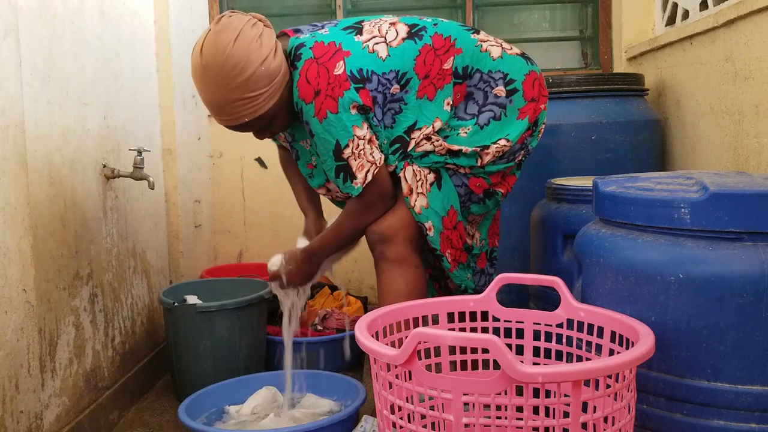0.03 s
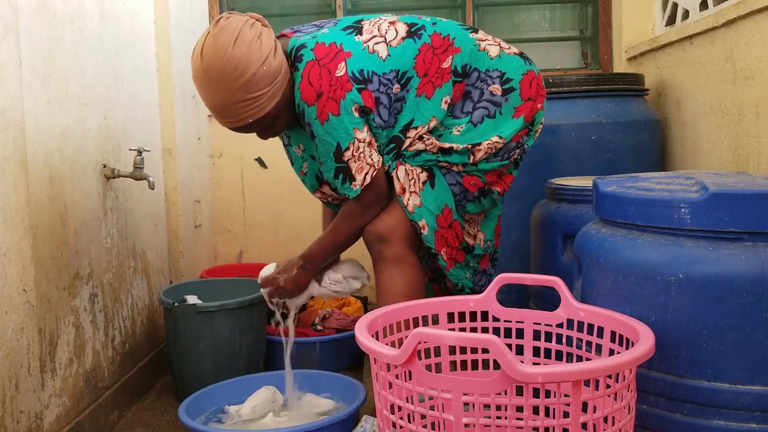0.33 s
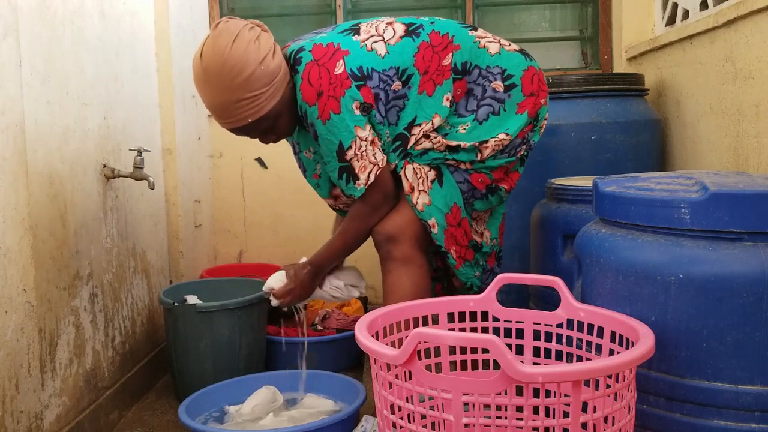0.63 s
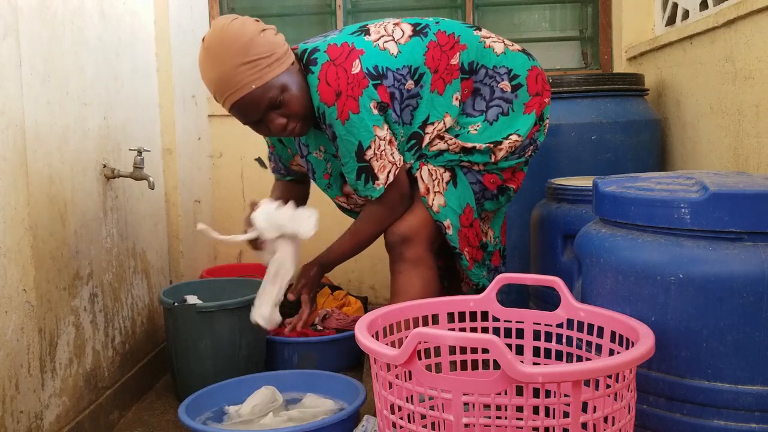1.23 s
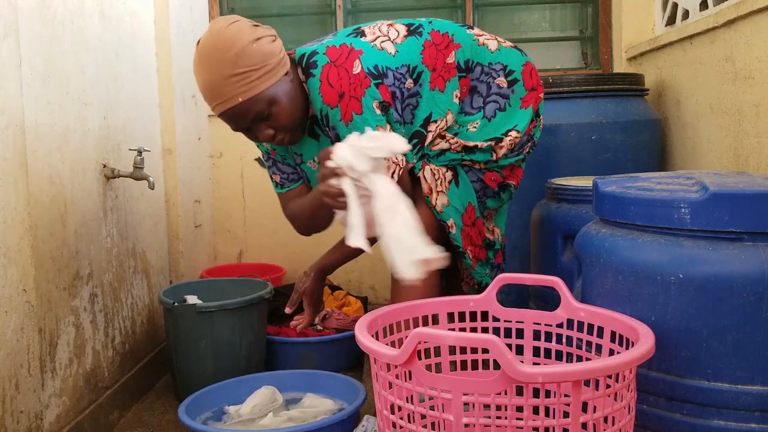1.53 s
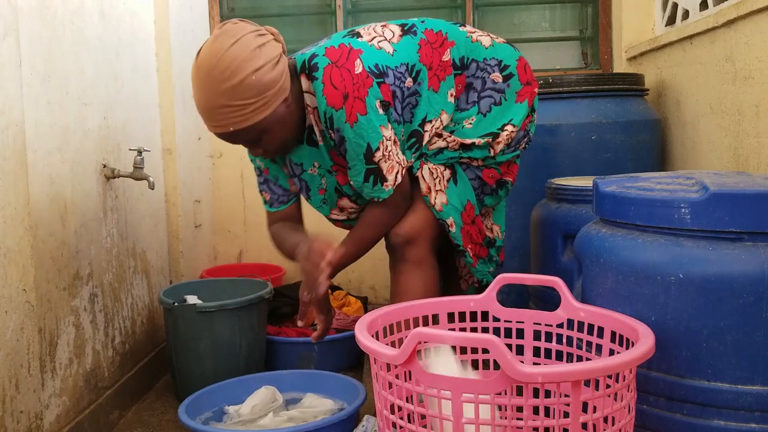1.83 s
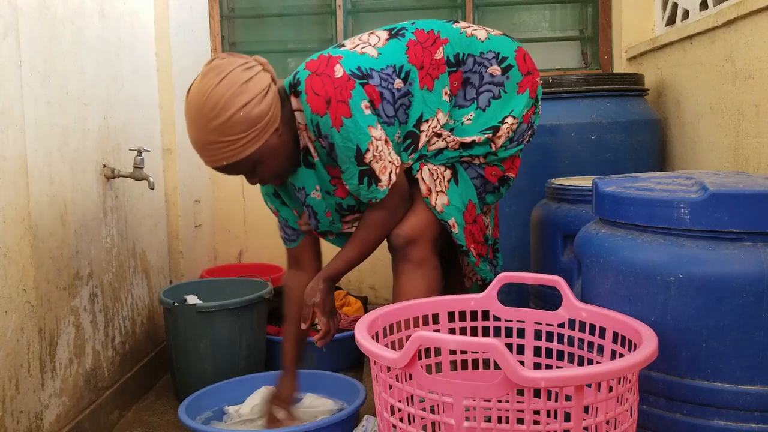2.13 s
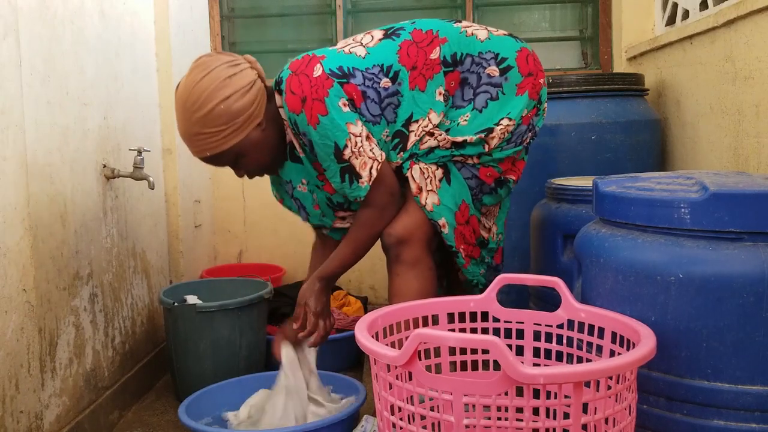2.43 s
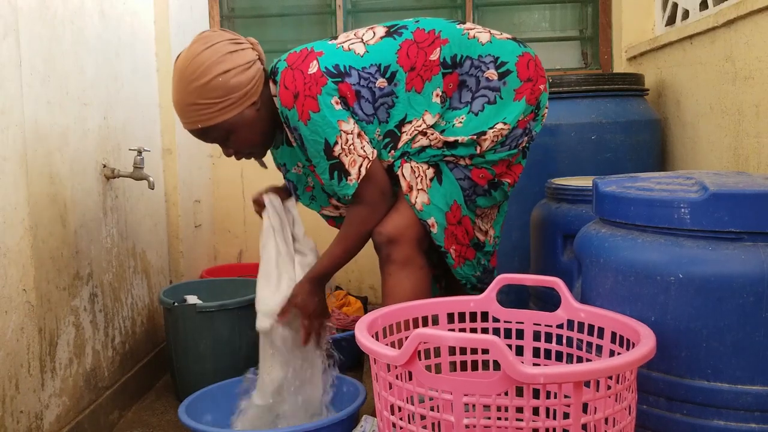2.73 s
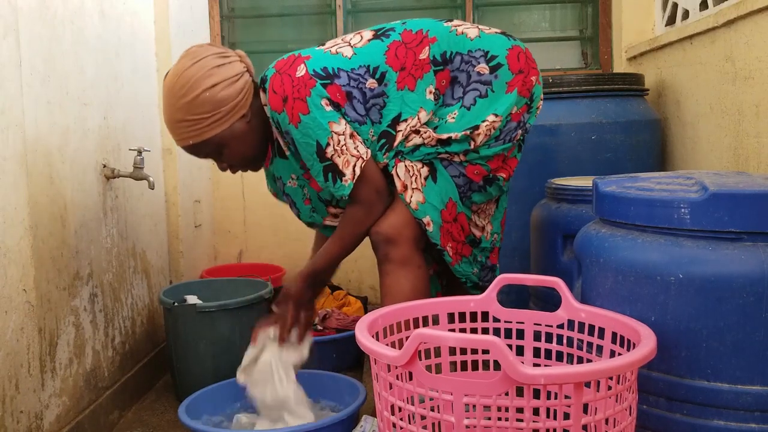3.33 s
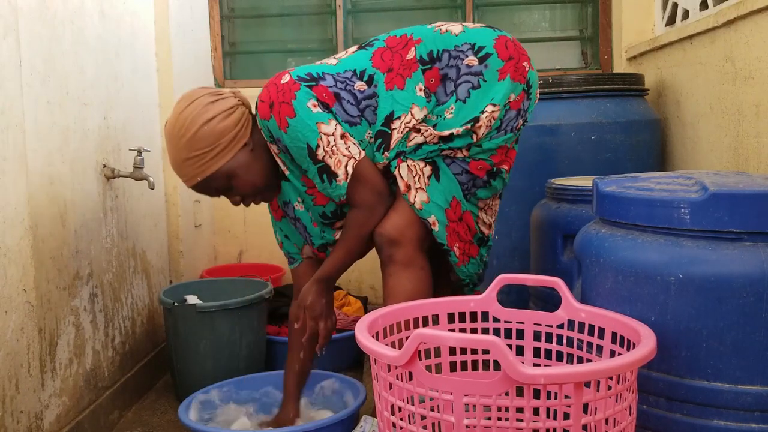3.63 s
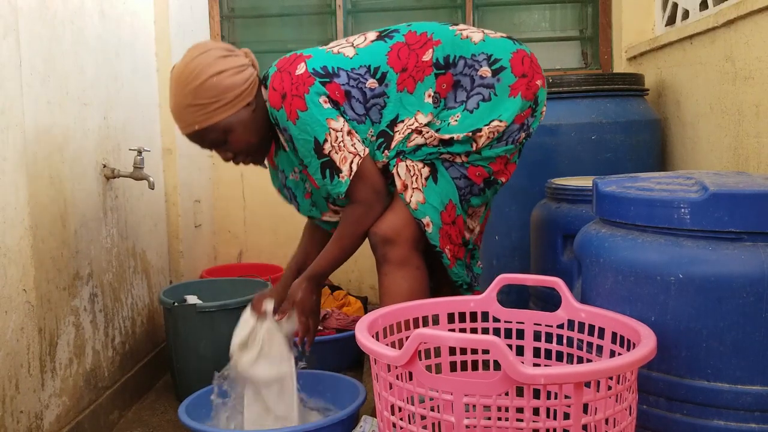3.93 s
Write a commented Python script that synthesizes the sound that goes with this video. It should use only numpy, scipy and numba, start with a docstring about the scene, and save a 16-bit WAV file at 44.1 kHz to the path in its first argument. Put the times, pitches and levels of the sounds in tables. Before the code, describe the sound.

Water patters into a plastic basin as cloth is wrung, thinning to a dribble. The wet cloth slaps into a plastic basket, then another piece is dunked with sloshing and gulps. A bird chirps twice in the small yard.

```python
"""Water wrung from a cloth patters into a plastic basin and thins to a dribble in a small walled yard.
The cloth slaps into a plastic basket, which rings; the next piece is lifted streaming and dunked again.
The water sounds through trapped air: each bubble is a damped oscillator, and thousands merge into patter
and slosh. A bird chirps twice, and a distant low rumble goes on throughout."""
import sys
import numpy as np
from scipy import signal
from scipy.fft import rfft, irfft
from scipy.io import wavfile
from scipy.ndimage import map_coordinates
from numba import njit

SR = 44100
rng = np.random.default_rng(int(sys.argv[2]) if len(sys.argv) > 2 else 0)


def inscribe(sig):
    """Save sig as 16-bit PCM at rate SR to the path in sys.argv[1].

    A 1-D sig is mono; a 2-D sig holds one channel per row.
    Samples are clipped to [-1, 1] before scaling.
    """
    pcm = np.round(np.clip(np.atleast_2d(sig).T, -1, 1) * 32767)
    wavfile.write(sys.argv[1], SR, pcm.astype(np.int16))


N = 176400
T = np.arange(N) / SR


# Twists of the cloth. Each row: peak time, rise and fall in seconds, relative patter and mist in dB.
TWISTS = [(.07, 0.93, 0.18, -29.5, -40), (.335, 0.082, 0.04, -35, -50), (.72, 1, 0.3, -51.5, -58)]
# Spectra of the stream, mist, basin and suds. Each row: frequency in Hz, relative level in dB.
STREAM_SPECTRUM = [(300, -6), (650, -14.5), (1100, -4.5), (2700, 2), (3700, -4.5), (5200, -4), (7500, -9.5)]
MIST_SPECTRUM = [(4500, 4), (7000, -4.5), (9000, -2), (12000, 1.5), (15500, -13)]
BASIN_SPECTRUM = [(600, -13), (670, -13), (800, -12), (1020, -9), (1130, 5), (1260, -11), (2000, -6)]
SUDS_SPECTRUM = [(7300, -21), (8000, 14), (9600, 11), (10200, -35)]

def wringing():
    """Drop impact: each twist sheds a stream that patters, throws mist, rings the basin and stirs suds."""
    patter = shaped(swarm(449, 7940, per_s=4000, cycles=9.9, spread_db=3.5), STREAM_SPECTRUM)
    mist = shaped(swarm(4500, 16000, per_s=9900, cycles=5, spread_db=-1), MIST_SPECTRUM)
    basin = shaped(swarm(575, 2020, per_s=1200, cycles=12, spread_db=3.5), BASIN_SPECTRUM)
    flow, mist_gain = surge_envelopes(TWISTS)
    hum_db, fade_db_per_s, end_s = -40, 13.5, 1.178
    hum_gain = undb(hum_db - fade_db_per_s * T) * np.clip((end_s - T) * 10, 0, 1)
    fizz = undb(-6) * shaped(mist, SUDS_SPECTRUM) * np.sqrt(mist_gain * hum_gain)
    return undb(4) * patter * flow + undb(6.5) * mist * mist_gain + basin * hum_gain + fizz


# Surges as the cloth is lifted and dunked. Each row: peak time, rise and fall in seconds,
# then relative levels of churn, slosh, patter and spray in dB.
SURGES = [(2.31, 0.059, 0.084, -50, -53, -45, -58), (2.42, 0.037, 0.24, -50.5, -36, -43, -50.5),
          (2.568, 0.066, 0.1, -36, -26.5, -28.5, -40), (2.83, 0.13, 0.19, -55, -27.5, -28, -33),
          (2.96, 0.045, .065, -41.5, -27, -29, -32), (3.108, 0.019, 0.16, -41, -46, -30.5, -31.5),
          (3.257, 0.01, 0.052, -58, -52.5, -31, -36.5), (3.461, 0.023, 0.049, -32, -30, -35.5, -32),
          (3.545, 0.087, 0.031, -35, -29.5, -34.5, -60), (3.629, 0.043, 0.071, -41, -29, -32, -40.5),
          (3.705, 0.049, 0.091, -57, -36.5, -29, -45.5), (3.85, 0.048, 0.1, -56, -41, -37, -44.5)]
# Spectra of those four layers. Each row: frequency in Hz, relative level in dB.
CHURN_SPECTRUM = [(280, -25), (380, -2.5), (470, 4), (600, -2)]
SLOSH_SPECTRUM = [(450, -33), (570, -11.5), (680, 0), (1000, 2.5), (1400, -5), (2200, -2.5)]
PATTER_SPECTRUM = [(700, -40), (1300, -1), (1850, -0.5), (2750, 1.5), (3300, -7.5), (5000, -32)]
SPRAY_SPECTRUM = [(2500, 2), (5200, 0.5), (6600, -1), (7500, -7.5), (9500, -6.5), (12000, -6),
                  (15500, -22.5)]

def rinsing():
    """Air entrainment: surges fold bubbles under and shed drops that excite the basin's lowest mode."""
    churn = shaped(swarm(281, 630, per_s=250, cycles=18.4, spread_db=2.5)[0], CHURN_SPECTRUM)
    slosh = shaped(swarm(499.4, 1887, per_s=650, cycles=22, spread_db=2.4), SLOSH_SPECTRUM)
    patter = shaped(swarm(881, 4920, per_s=2400, cycles=16.7, spread_db=5), PATTER_SPECTRUM)
    spray = shaped(swarm(2820, 16900, per_s=7700, cycles=5.4, spread_db=4.5), SPRAY_SPECTRUM)
    basin_mode = unit(signal.lfilter(*signal.iirpeak(634, Q=9.3, fs=SR), slosh))
    plunge, stir, runoff, throw = surge_envelopes(SURGES)
    falling_water = (undb(-8) * basin_mode + undb(0.5) * patter) * runoff
    return churn * plunge + undb(1) * slosh * stir + falling_water + undb(5.5) * spray * throw


# Large air pockets. Each row: start in seconds, pitch in Hz, relative level in dB, cycles to fall 30 dB.
AIR_POCKETS = [(.84, 684, -38.5, 20), (1.803, 688, -28.5, 15), (2.21, 666, -18.5, 9.3),
               (2.214, 844, -23.5, 11), (2.235, 180, -27.5, 11.6), (2.24, 610, -26, 10),
               (2.482, 469, -27, 11), (2.565, 715, -18.5, 22), (2.79, 1375, -19.5, 27),
               (2.825, 734, -17, 21), (2.838, 934, -21, 12), (3.022, 400, -24.5, 12.4),
               (3.095, 385, -26.5, 16), (3.251, 2390, -18.5, 22), (3.452, 636, -23.5, 30),
               (3.464, 930, -22, 23), (3.54, 652, -22, 35), (3.552, 900, -21, 22), (3.835, 1010, -23, 30),
               (3.858, 727, -35, 30)]

def gulps():
    """Bubble resonance: a pocket of air rings as the water closes on it."""
    start, hz, db, cycles = np.array(AIR_POCKETS, float).T.copy()
    return bubbles(start, hz, 2 * cycles, undb(db + 7.5), onset_rad=9.2)


@njit
def bubbles(start, hz, cycles, amplitude, onset_rad):
    """Damped oscillation: each bubble swells, then falls 60 dB over its cycles as its pitch climbs 11%."""
    out = np.zeros(N)
    for k in range(len(start)):
        first, phase = int(start[k] * SR), 0.
        n = int(cycles[k] / hz[k] * SR) + 2
        for i in range(min(n, N - first)):
            phase += 2 * np.pi * hz[k] * (1 + 0.11 * i / n) / SR
            envelope = np.exp(-6.9 * i / n) * (1 - np.exp(-phase / onset_rad))
            out[first + i] += amplitude[k] * envelope * np.sin(phase)
    return out


def swarm(lo_hz, hi_hz, per_s, cycles, spread_db):
    """Superposition: random bubbles and drops, louder in brief clusters of like pitch, merge in stereo."""
    clusters_per_s, cluster_db, path_spread_s = 22, 3, .002
    when, pitch, ring, size, *paths = rng.random((int(per_s * N / SR), 6)).T
    start = when * N / SR
    hz = lo_hz * (min(hi_hz, SR / 2.6) / lo_hz) ** pitch
    time_and_pitch = [start * clusters_per_s, 2 * np.log2(hz / lo_hz)]
    cluster = map_coordinates(rng.standard_normal((200, 20)), time_and_pitch, order=1, mode="mirror")
    amplitude = undb(cluster_db * cluster - spread_db * np.log(size * .97 + .03)) * hz
    arrivals = [start + path_spread_s * path for path in paths]  # one path to each microphone
    return unit(np.array([bubbles(s, hz, cycles * (.5 + ring), amplitude, 2.3) for s in arrivals]))


def surge_envelopes(rows):
    """Incoherent addition: overlapping surges sum in power, giving one gain curve per level column."""
    power = 0
    for peak, rise, fall, *db in rows:
        exponent = np.where(T < peak, ((T - peak) / rise) ** 2, np.abs((T - peak) / fall) ** 1.29)
        power = power + (undb(db)[:, None] * np.exp(-exponent)) ** 2
    return np.sqrt(power)


# Wet folds landing. Each row: start in seconds, level in dB, attack, hold and decay in seconds,
# treble tilt in dB per octave.
SLAPS = [(1.724, -31.5, 0.012, 0.03, 0.013, -1.5), (1.888, -30, 0.0022, .015, 0.03, -6),
         (1.909, -11, 0.0024, .004, 0.0073, 0), (1.922, -17, 0.0025, 0.016, 0.022, -2),
         (2.007, -28, 0.012, .006, 0.0063, -1.5), (2.029, -19, .002, 0.019, 0.014, -1),
         (2.058, -19.5, 0.0013, 0.0016, 0.02, -1)]
# Spectrum of the smacks. Each row: frequency in Hz, relative level in dB.
SLAP_SPECTRUM = [(100, -7), (400, -21.5), (950, 1), (1800, 1), (2800, -3.5), (5500, -4), (7500, -12.5),
                 (11500, -15), (16000, -25)]
# Modes of the basket. Each row: frequency in Hz, relative level in dB, seconds to fall 60 dB.
BASKET_MODES = [(767, -9, 0.07), (995, -2, 0.041), (1156, 12, 0.043)]

def slaps():
    """Impact excitation: wet cloth lands in bursts of tiny smacks that ring the basket's modes."""
    smacks = shaped(rng.standard_normal(N) * undb(4.7 * rng.standard_normal(N)), SLAP_SPECTRUM)
    cloth = np.zeros(N)
    for start, db, attack, hold, decay, tilt in SLAPS:
        onset = np.clip((T - start) / attack, 0, 1)
        release = np.exp(-np.maximum(T - start - attack - hold, 0) / decay)
        cloth += undb(db) * onset * release * unit(colour(smacks, [(250, -3 * tilt), (16000, 3 * tilt)]))
    t = T[:SR // 4]
    ring = sum(undb(db - 60 * t / t60) * np.sin(2 * np.pi * hz * t) for hz, db, t60 in BASKET_MODES)
    basket = signal.fftconvolve(cloth * np.abs(cloth), ring)[:N]  # square law favours hard smacks
    return cloth + undb(-5) * unit(basket) * cloth.std()


# Contour of a chirp before scaling. Each row: offset in seconds, pitch in Hz, level in dB,
# tremble as a fraction of the pitch.
CHIRP_CONTOUR = [(0.026, 5440, -57, 0.0777), (.052, 5020, -26.5, 0.095), (0.087, 4840, -32, 0.13),
                 (.105, 4840, -41, 0.17), (.138, 4290, -37, 0.14), (.156, 3550, -39.5, 0.11),
                 (.19, 3450, -44.5, .08), (.245, 3350, -49, .08)]
# The two calls. Each row: start in seconds, pitch ratio, length ratio, gain in dB.
CHIRPS = [(1.408, 1, 1, -0.5), (1.975, 0.89, 1.1, 4.5)]

def bird():
    """Frequency modulation: a random tremble roughens each chirp, which drops to a clearer held note."""
    out = np.zeros(N)
    offset, hz, db, tremble = np.array(CHIRP_CONTOUR).T
    for start, pitch, length, gain_db in CHIRPS:
        times = start + length * offset
        waver = np.tanh(2 * shaped(rng.standard_normal(N), [(120, 0), (450, 0)]))
        track_hz = pitch * np.interp(T, times, hz) * (1 + np.interp(T, times, tremble) * waver)
        envelope = undb(gain_db + np.interp(T, times, db)) * (T > times[0]) * (T < times[-1])
        out += envelope * np.sin(2 * np.pi * np.cumsum(track_hz) / SR)
    return out


# Spectra of the outdoor air and the distant rumble. Each row: frequency in Hz, relative level in dB.
AIR_SPECTRUM = [(100, -13), (190, 1.5), (280, 1.5), (360, -8), (700, -16.5), (1500, -17.5), (3200, -27),
                (5500, -28), (7200, -40.5), (15000, -41)]
RUMBLE_SPECTRUM = [(22, -22), (36, -7), (50, -9), (68, 1.5), (88, -2), (105, -13), (125, -10), (160, -25.5),
                   (300, -33.5)]

def background():
    """Ambient noise: air, decorrelated and so wide in the treble, over a rumble with one soft boom."""
    mid, side = (shaped(rng.standard_normal(N), AIR_SPECTRUM) for _ in range(2))
    side = colour(side, [(60, -18), (125, -14), (250, -14.5), (600, -5.5), (1500, 1)])
    air = undb(-47.5) * np.array([mid + side, mid - side])
    rumble = undb(-38) * shaped(rng.standard_normal(N), RUMBLE_SPECTRUM)
    since_peak = T - 1.345
    boom = undb(-15) * np.exp(-(since_peak / .045) ** 2) * np.sin(2 * np.pi * 69 * since_peak)
    return air + rumble + boom


def yard(x, tail_db, early_db):
    """Reverberation: close reflections from basin and walls and a short tail follow the direct sound."""
    low_t60_s, treble_t60_s, early_decay_s = 0.24, 0.3, 0.0055
    t = T[:SR // 2]
    noise = rng.standard_normal((2, len(t)))
    low = signal.sosfilt(signal.butter(1, 4000, fs=SR, output="sos"), noise)
    tail = low * undb(-60 * t / low_t60_s) + (noise - low) * undb(-60 * t / treble_t60_s)
    tail *= np.minimum(t / .012, 1)
    early = rng.standard_normal((2, len(t))) * np.exp(-t / early_decay_s)
    response = sum(undb(db) * part / np.linalg.norm(part, axis=1, keepdims=True)
                   for db, part in ((tail_db, tail), (early_db, early)))
    response = signal.sosfilt(signal.butter(2, 380, "high", fs=SR, output="sos"), response)
    response[:, 0] += 1  # direct path
    response /= np.sqrt(np.sum(response ** 2) / 2)
    return signal.fftconvolve(np.atleast_2d(x), response, axes=1)[:, :N]


def undb(db):
    """Decibels to amplitude ratio."""
    return 10 ** (np.asarray(db) / 20)


def unit(x):
    """Normalisation to rms 1."""
    return x / np.sqrt(np.mean(x ** 2))


def colour(x, points, scale=1):
    """Zero-phase filtering through (Hz, dB) points on a logarithmic frequency axis."""
    hz, db = np.array(points, float).T
    log_hz = np.log(np.fft.rfftfreq(N, 1 / SR) + 1)
    return irfft(rfft(x) * undb(scale * np.interp(log_hz, np.log(hz), db)), N)


def shaped(x, points):
    """Band limiting: the filter follows the points and drops 30 dB in the octave beyond; rms 1."""
    (lo, lo_db), (hi, hi_db) = points[0], points[-1]
    return unit(colour(x, [(lo / 2, lo_db - 30), *points, (hi * 2, hi_db - 30)]))


def scene():
    """Superposition: each source, with its own share of reflections, adds to the background."""
    return (background()
            + yard(slaps(), tail_db=-1.5, early_db=3.5)
            + yard(gulps(), tail_db=5, early_db=-9)
            + yard(bird(), tail_db=3.5, early_db=7)
            + yard(wringing() + rinsing(), tail_db=-1.5, early_db=-7))


# Microphone imbalance. Each row: frequency in Hz, left minus right in dB before scaling.
MIC_BALANCE = [(300, 1.7), (700, 1), (1300, 2), (4600, 7), (8000, 0.5), (12000, -4.5), (16000, -8)]

def record(dry):
    """Frequency response: each microphone takes about half the imbalance; peaks clip, the top is cut."""
    heard = np.array([colour(dry[0], MIC_BALANCE, 0.51), colour(dry[1], MIC_BALANCE, -0.57)])
    low_pass = signal.ellip(10, .1, 80, 15850, fs=SR, output="sos")
    return signal.sosfilt(low_pass, np.clip(heard, -1, 1))


dry = scene()
out = record(dry)
inscribe(out)
```